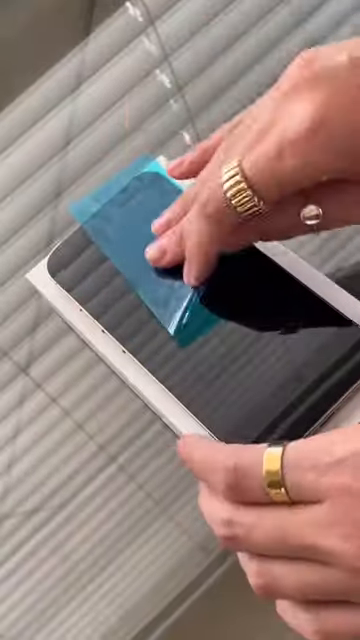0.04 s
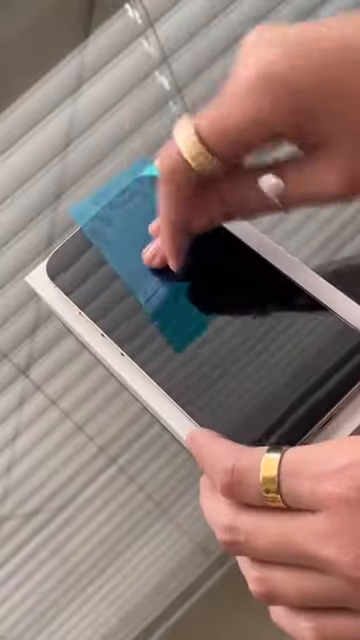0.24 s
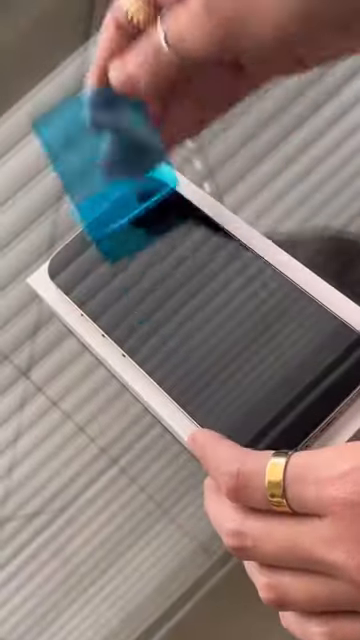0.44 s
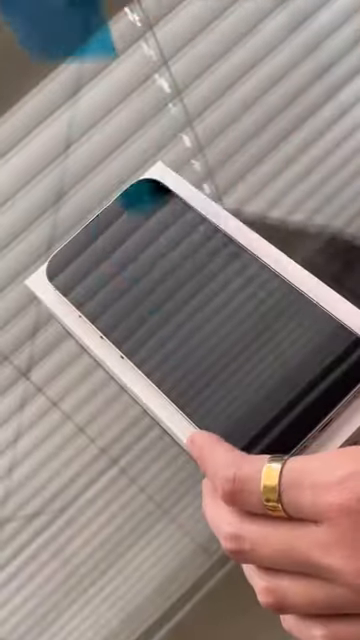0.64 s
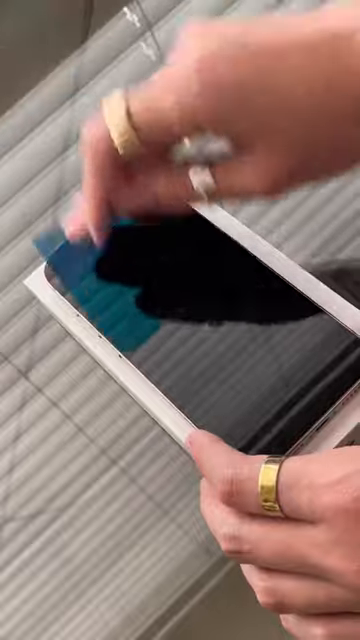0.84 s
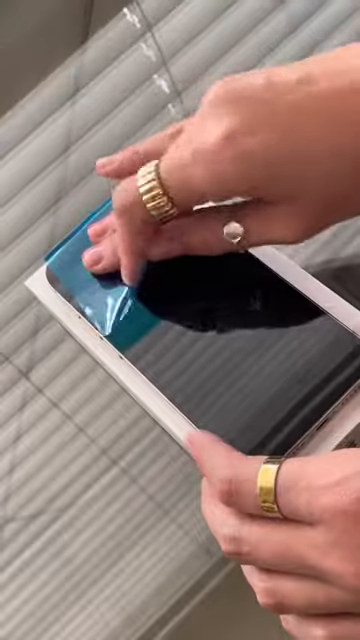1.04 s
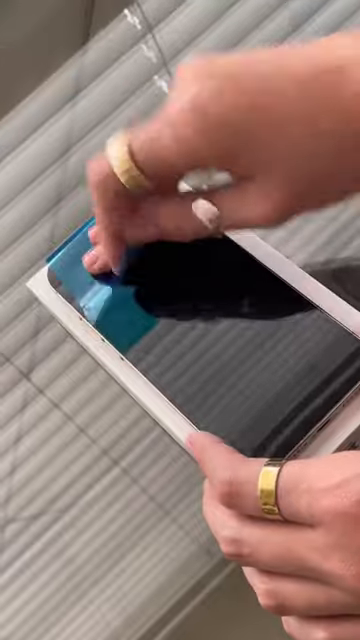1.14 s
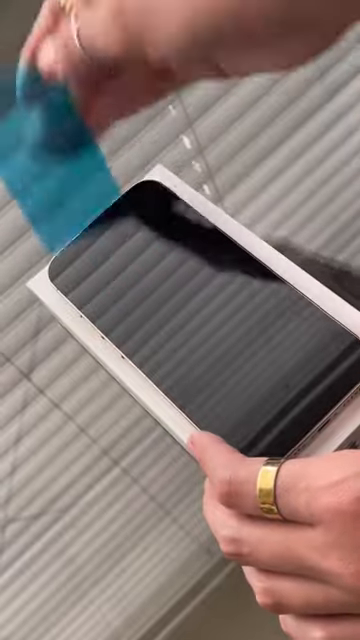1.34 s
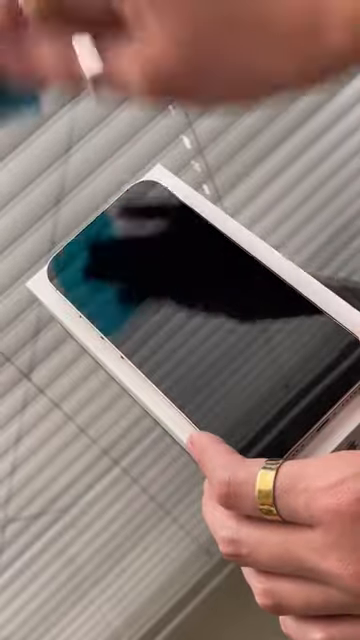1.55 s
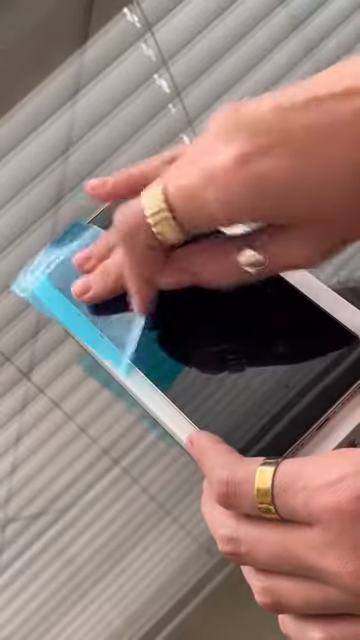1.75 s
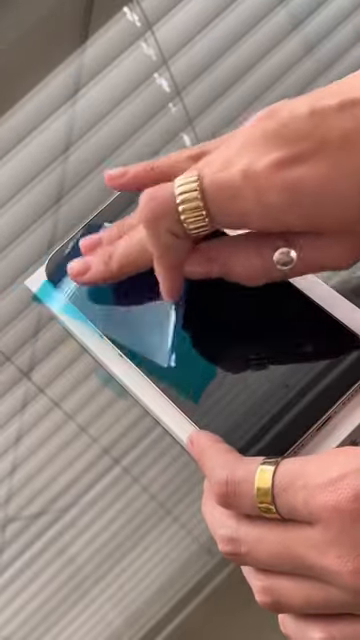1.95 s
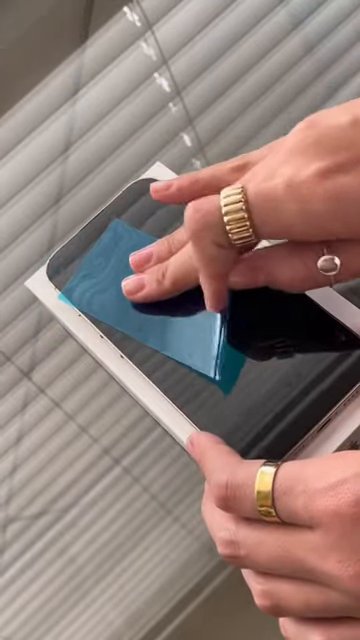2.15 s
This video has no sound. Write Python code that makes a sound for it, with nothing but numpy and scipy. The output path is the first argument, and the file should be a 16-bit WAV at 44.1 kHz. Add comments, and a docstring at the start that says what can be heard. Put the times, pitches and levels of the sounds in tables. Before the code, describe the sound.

Close up in a small room, fingers peel stiff plastic film off glass with dry clicks and crackles, first a short burst, later a brighter rapid one, then one knock and light crinkling over soft low rumble.

```python
"""In a small room, fingers drag and peel thin plastic film off a phone screen, close to the microphone.
The film lets go in sharp snaps: each is a noise spike with a short crackling tail, a ring and a dull thump.
Among them it rustles under the fingers, made from swells of noise.
The room answers these sounds with fading noise, and filtered noise makes a low ventilation rumble."""
import sys
import numpy as np
from scipy import signal
from scipy.fft import rfft, irfft, next_fast_len
from scipy.io import wavfile
from scipy.ndimage import uniform_filter1d, map_coordinates

SR = 44100
rng = np.random.default_rng(int(sys.argv[2]) if len(sys.argv) > 2 else 0)


def unload_audio(sound):
    """Save the sound as a 16-bit wav file, at the path given as the first command line argument."""
    columns = np.transpose(np.atleast_2d(sound))
    # keep every value between -1 and 1, then stretch to whole-number steps
    steps = np.round(np.clip(columns, -1, 1) * 32767)
    wavfile.write(sys.argv[1], SR, steps.astype(np.int16))


N = 97020  # length of the scene [samples], 2.2 s

# Frequencies at which the film's colour and the left-right balance are set: (frequency [Hz])
BAND_CENTRES_HZ = [300, 750, 1800, 3100, 4500, 6000, 8300, 10300, 12600, 16800]


def snaps():
    """A spike as the glue lets go, a brief ring, gritty crackle that holds and dies away, a dull thump."""
    # Each snap: (time [s], level [dB], crackle [dB], crackle t60 [ms], ring [Hz], thump [dB],
    # low [dB], body [dB], bright [dB], air [dB]); the last four tilt the film's colour against 3 kHz
    snap_list = [(0.2389, -17, -3, 25.57, 6240, -21, -8, -7, 4.5, 3.5),
                 (0.2718, -15, -3.5, 23.7, 5420, -27, -9, -6.5, -2.5, -3),
                 (0.2899, -25, -3.0, 31.5, 7000, -9, -5.5, 4, 4, -6),
                 (0.3077, -8.5, -15.5, 31.04, 3030, -26.5, -12, -1, -2, 0.5),
                 (0.309, -11, -12, 32.2, 2090.0, -35, -17, 0, -3.5, 6),
                 (0.361, -14.5, -8.5, 22.0, 3060, -22.5, -11, 0.5, -7.5, -10.0),
                 (0.3632, -18.5, -9, 32.0, 3200, -11, -0.5, -4.0, -1, -11),
                 (0.3956, -8.5, -15, 32.1, 5940.0, -22.5, -11, -9, -8, -19),
                 (0.4717, -19, -4, 32.0, 5630, -44, -9.5, -8.5, 0, -6.0),
                 (0.4746, -18, -3, 32.3, 3950, -29, -5, -11.5, 0, -3),
                 (0.4977, -27, -1, 32.0, 4180, -32, -12, -10, -7, -8),
                 (0.5155, -27, -13.5, 32.3, 4160, -11, -7.5, -2.5, -1.0, -7.5),
                 (0.5239, -16, -7, 28.9, 6100, -21.5, -8.5, -1, 2, -3),
                 (0.8386, -42.5, -3.5, 31.9, 2460, -16.5, 9, -15, -4, -19),
                 (0.8546, -27, -13, 31.7, 3080, -25.0, -11.5, -9.0, -9.5, -14.5),
                 (0.8925, -56, 2, 32.0, 3790.0, -30.0, -6.5, 0, -6, -27),
                 (0.9497, -58.0, -6.5, 32.0, 3050, -28, -9.5, -4, 1.5, -1.0),
                 (1.0392, -65, -11.5, 31.7, 2000, -27, -10.5, -6.5, -1, -13.5),
                 (1.0461, -62.5, -7.5, 32.0, 1830.0, -27, -9, -3.5, -1.5, -15),
                 (1.0826, -55, -6, 31.8, 5280.0, -30.0, -8.5, -6.0, -5, -27),
                 (1.1206, -14.5, -12, 32.0, 3240, -34.0, -12.5, -10, -3.5, -6),
                 (1.1458, -10, -17, 32.0, 6060, -53, -15.5, -3.5, 3.0, 1.5),
                 (1.1806, -8.0, -16, 31.9, 5900, -34.0, -13.5, 2, 8.5, -8),
                 (1.1989, -13.5, -11, 31.8, 5830, -51, -9, 2.5, 9.5, 2.5),
                 (1.2135, -13.5, -11.5, 25.6, 5940.0, -39, -13.0, 2, 2.5, 4.0),
                 (1.2309, -12.5, -8.5, 31.8, 5800, -45, -4.5, 3.5, 4.5, 5.5),
                 (1.2377, -21.0, -12, 32.0, 5900, -20, -4.5, -1, -4, -8),
                 (1.2553, -17, -11, 32.0, 6300, -30, 0.5, -8.5, -1.5, -5),
                 (1.2636, -17.5, -6, 31.75, 6050, -29.0, 0, -3.0, -3.5, -6),
                 (1.284, -13.5, -6.5, 32.0, 3500, -27, -8.5, -6.5, -1.5, -7),
                 (1.3021, -20, -5, 32.2, 5600, -26.5, -7, 0.5, 6.5, -1),
                 (1.4833, -62.5, 1.5, 32.0, 1810.0, -29.5, -10.0, -6.0, 1.0, 5.5),
                 (1.6394, -16.5, -14.5, 26.1, 2100, -15, 6, 10, 3.0, -7.5),
                 (1.6682, -29.5, -23, 32.0, 5200, -31.0, -4.5, -4.5, 0.5, -10),
                 (1.6713, -33.0, -9.5, 32.0, 5230.0, -26, -22, -11, -2, -17.5),
                 (1.6858, -32, -10, 31.7, 2480, -17, 4, -3, 7, -2),
                 (1.7241, -32.5, -5.5, 32.0, 5370, -27, -1, -8, 7, 8),
                 (1.7284, -31.0, -7.5, 32.0, 5560, -37, -10.0, -1, 5, 4.5),
                 (1.7364, -35, -13, 32.0, 7340.0, -24, -16.0, 3, 12.5, 5.5),
                 (1.77, -50, -12, 30.0, 7100, -30.0, -10.0, 5, 0, -17),
                 (1.8201, -54.5, -4.5, 32.0, 1800, -31, -8, -4, -7, -5.0),
                 (1.846, -28, -15.0, 32.0, 8000, -33, -46, 0.5, 7, 1.5),
                 (1.8811, -24.5, -7.5, 32.0, 5930, -29, -35, -36, -5.5, 13.5),
                 (1.8913, -31, -5, 32.2, 5400.0, -32, -5.5, -4, 4.5, -36),
                 (1.912, -30.5, -6.5, 32.0, 6630, -15.5, -9.0, -4.5, -2.5, -7),
                 (1.9188, -26, -14.5, 32.2, 5520, -39, -13.0, -8.0, 9, -9),
                 (2.0453, -46, -14, 32.0, 3880.0, -31, -8.5, 0, -4, -17),
                 (2.066, -46, -13, 31.7, 2170.0, -30.0, -7, -4, -7, -30),
                 (2.0886, -30, -14.5, 27.3, 6300, -14, -25, 5, 9, -11),
                 (2.1, -48, -5, 32.0, 5980, -31, -7, -1, 6, -5)]
    # How the phone body thumps: (frequency [Hz], level [dB], t60 [s])
    body_tones = [(205, -6, 0.096), (281, 1, 0.026), (523, -3, 0.038)]
    spike_ms, spike_db = 0.32, 1
    rise_ms, hold_ms, gritty_db = 1, 1.1, 2
    creak_db, creak_ms = -16, 4.1  # the glue strains just before it lets go
    ring_db, ring_t60_s = -5, 0.012  # the freed patch of film rings briefly

    out = np.zeros(N + SR)
    ms = np.arange(-882, 4410) / SR * 1000  # time from the snap; it lets go at 0
    before_ms = np.minimum(ms, 0)
    after_s = np.maximum(ms, 0) / 1000
    rise = np.maximum(np.exp(before_ms / rise_ms), amp(creak_db) * np.exp(before_ms / creak_ms))

    for time, level_db, crackle_db, t60_ms, ring_hz, thump_db, *colour in snap_list:
        random_signs = np.sign(rng.standard_normal(len(ms)))
        spike = amp(spike_db) * np.exp(-abs(ms) / spike_ms) * random_signs

        shape = rise * amp(-60 * np.maximum(ms - hold_ms, 0) / t60_ms)
        grit = amp(crackle_db + gritty_db * wobble(894, len(ms)))
        crackle = shape * grit * rng.standard_normal(len(ms))

        ring = amp(ring_db - 60 * after_s / ring_t60_s) * np.sin(2 * np.pi * ring_hz * after_s)

        thump = np.zeros(len(ms))
        for hz, tone_db, t60_s in body_tones:
            start_db = thump_db + tone_db + rng.normal(0, 2.9)  # no two thumps alike
            thump += amp(start_db - 60 * after_s / t60_s) * np.sin(2 * np.pi * hz * after_s)

        snap = film(spike + crackle, *colour) + ring + thump
        add(out, time + ms[0] / 1000, amp(level_db) * snap)
    return out[:N]


def rustles():
    """Soft swells of fine grit while the film slides under the fingers."""
    # Each rustle: (centre [s], half length [s], level [dB], low [dB], body [dB], bright [dB], air [dB])
    rustle_list = [(0.216, .03, -70, -6.5, -9.5, 6.5, -3), (0.294, .01, -30, -5, -12, 15, 4.5),
                   (0.392, 0.0083, -40, -2, -9.5, 7, -5), (0.475, 0.0033, -27.5, -3.5, -9, 4, -6.5),
                   (0.494, .012, -38.5, -7, -9, -2, -11), (.85, 0.014, -42, -3, -4, -9, -18),
                   (0.897, 0.017, -66.5, 2, 2, 1.5, -14), (.95, 0.025, -68.5, -8, -4.5, -1, -1.5),
                   (1.197, 0.02, -31, -3.5, -13.5, 22.5, 11.5), (1.247, 0.024, -38.5, 4.5, -3, -1, 6),
                   (1.266, 0.029, -37.5, -11, 3, 2, 0), (1.303, 0.019, -36, -11, -5, 5.5, -3.5),
                   (1.318, 0.016, -43.5, 5.5, -8, 3.5, -3.5), (1.681, 0.032, -47.5, -4.5, 4, 3, -1.5),
                   (1.753, 0.017, -51.5, 5, 1, 14, -2), (1.88, .014, -37.5, -13.5, -7.5, -0.5, -3.5),
                   (1.919, 0.0224, -44, -4, -2.5, 0, -28), (1.814, .025, -63.5, -4, 0, -6, 0.5),
                   (2.073, 0.034, -58, 9, 3, 0, -20)]
    grit_db = 3.5  # how strongly the level flutters
    out = np.zeros(N + SR)
    t = np.arange(-3528, 3528) / SR  # seconds from the centre
    for centre, half_s, level_db, *colour in rustle_list:
        swell = np.exp(-(t / half_s) ** 4) * amp(level_db + grit_db * wobble(250, len(t)))
        add(out, centre + t[0], film(swell * rng.standard_normal(len(t)), *colour))
    return out[:N]


def film(x, low, body, bright, air):
    """The film's colour, tilted by how it is held, in place of the broad colour of x; loudness kept."""
    # Colour that all film sounds share, one value per band: (level [dB])
    shared_colour_db = [0, 2.5, 1.5, 0.5, 1, -0.5, -4.5, -8.5, 0.5, -9.5]
    tilt_db = [low, low, body, 0, bright / 2, bright, bright, (bright + air) / 2, air, air]
    colour = list(zip(BAND_CENTRES_HZ, np.add(shared_colour_db, tilt_db)))

    hz, spectrum = np.fft.rfftfreq(len(x), 1 / SR), rfft(x)
    # Divide by the smoothed spectrum, so only fine detail is left to be coloured
    broad_power = abs(uniform_filter1d(abs(spectrum) ** 2, size=len(x) // 60))
    even = spectrum / np.sqrt(broad_power + 1e-20)
    coloured = irfft(even * amp(along(colour, hz)) * (hz > 80), len(x))
    return coloured * np.linalg.norm(x) / np.linalg.norm(coloured)


def close(x):
    """The direct sound: each side gets slightly different scattering off hands and table."""
    # Left over right, one value per band: (level difference [dB])
    balance_db = [0.2, 1, 0, -1.2, -0.5, -0.4, -0.3, -.5, -0.4, 1]
    wide_db, spread_ms = -7.5, 6  # spread_ms: time for the scattering to fade by 60 dB

    def smear():
        ms = np.arange(441) / SR * 1000
        burst = rng.standard_normal((1, 441)) * amp(-60 * ms / spread_ms)
        return burst / np.linalg.norm(burst)

    both = pair(x, scattered(x, smear)[0], wide_db)
    balance = list(zip(BAND_CENTRES_HZ, balance_db))
    halves = np.array([[0.5], [-0.5]])  # half the difference up on the left, half down on the right
    return filtered(both, lambda hz: amp(along(balance, hz) * halves))


def room(x):
    """A diffuse tail of fading noise, duller than the direct sound, in which the low end lasts longest."""
    # How long the room rings: (frequency [Hz], t60 [s])
    room_t60 = [(300, 0.9), (1500, .3), (5000, 0.22), (8500, .26), (10500, .18), (13000, 0.32),
                (16000, .12)]
    # Colour of the sound fed to the room: (frequency [Hz], level [dB])
    room_colour = [(500, -2.5), (2000, -1.5), (8500, -1), (10300, -4.5), (12500, -2), (16000, -5)]
    room_db, delay_ms, wide_db = -14, 3, 5

    def tail():
        hz, t, noise = signal.stft(rng.standard_normal((2, SR // 3)), SR, nperseg=128)
        fade = amp(-60 * t / along(room_t60, hz)[:, None])
        fading = signal.istft(noise * fade, SR, nperseg=128)[1]
        delay = round(delay_ms * SR / 1000)
        return np.pad(fading / np.linalg.norm(fading[0]), ((0, 0), (delay, 0)))

    dull = filtered(x, lambda hz: amp(room_db + along(room_colour, hz)))
    return pair(*scattered(dull, tail), wide_db)


def rumble():
    """Low ventilation noise, slowly easing off."""
    # Colour of the noise: (frequency [Hz], relative level per hertz [dB])
    rumble_colour = [(15, -33.5), (30, -14.5), (70, 2), (95, -3.5), (125, -1), (170, -13.5), (245, -2),
                     (310, -13.5), (370, -10.5), (480, -21.5), (800, -28), (2000, -34), (2700, -46),
                     (5000, -52.5), (9000, -60), (13000, -63.5), (16500, -63.5)]
    # Loudness over time: (time [s], level [dB])
    rumble_level = [(0, -44), (.6, -44.5), (1.2, -45.5), (1.5, -46.5), (2.2, -46.5)]
    sway_db, wide_db = 1.2, 2
    noise = unit(filtered(rng.standard_normal((2, N)), lambda hz: amp(along(rumble_colour, hz))))
    level_db = np.interp(np.arange(N) / SR, *np.transpose(rumble_level))
    level_db = level_db + sway_db * wobble(3.3, N)
    return amp(level_db) * pair(*noise, wide_db)


def scattered(x, answer):
    """x in 30 ms stretches, each smeared by a newly drawn impulse response, as from many reflections."""
    out, step = np.zeros((2, N + SR)), 1323
    for i in range(0, N, step):
        wet = signal.fftconvolve(x[None, i:i + step], answer(), axes=1)
        out[:, i:i + wet.shape[1]] += wet
    return out[:, :N]


def pair(mid, other, wide_db):
    """Left and right from a shared middle and a second signal, added on one side and taken off the other."""
    # Side against middle for the microphone pair, before wide_db: (frequency [Hz], level [dB])
    side_level = [(60, -48.5), (110, -45.5), (200, -38), (380, -16), (700, -7), (1290, -7.5), (2380, -30),
                  (4400, -13), (8120, -9.5), (15000, -7)]
    side = filtered(other, lambda hz: amp(along(side_level, hz) + wide_db))
    return np.array([mid + side, mid - side])


def amp(db):
    """Decibels to a plain factor."""
    return 10 ** (np.asarray(db) / 20)


def unit(x):
    """x scaled to an average (RMS) size of 1."""
    return x / np.sqrt(np.mean(x ** 2) + 1e-20)


def along(points, hz):
    """Read a curve of (Hz, value) points, with frequency on a log axis."""
    f, v = np.transpose(points)
    return np.interp(np.log(hz + 1), np.log(f + 1), v)


def filtered(x, response):
    """Make each frequency of x louder or softer by the factor response(hz)."""
    m = next_fast_len(x.shape[-1] + 2048)
    hz = np.fft.rfftfreq(m, 1 / SR)
    return irfft(rfft(x, m) * response(hz), m)[..., :x.shape[-1]]


def wobble(rate, size):
    """A smooth random curve through `rate` random points a second."""
    points = rng.standard_normal(int(size * rate / SR) + 4)
    return map_coordinates(points, [np.arange(size) * rate / SR])


def add(track, s, x):
    """Mix x into the track from time s [s]."""
    i = round(s * SR)
    track[i:i + len(x)] += x


def scene():
    """The film heard directly and through the room, over the rumble."""
    near = snaps() + rustles()
    return close(near) + room(near) + rumble()


def record(dry):
    """The microphone rolls off and keeps nothing from its band limit up."""
    # The microphone's top end: (frequency [Hz], level [dB])
    roll_off = [(15700, -0.5), (16100, -12), (16800, -26.5)]
    top_hz = 16800
    return filtered(dry, lambda hz: amp(along(roll_off, hz)) * (hz < top_hz))


dry = scene()
out = record(dry)
unload_audio(out)
```